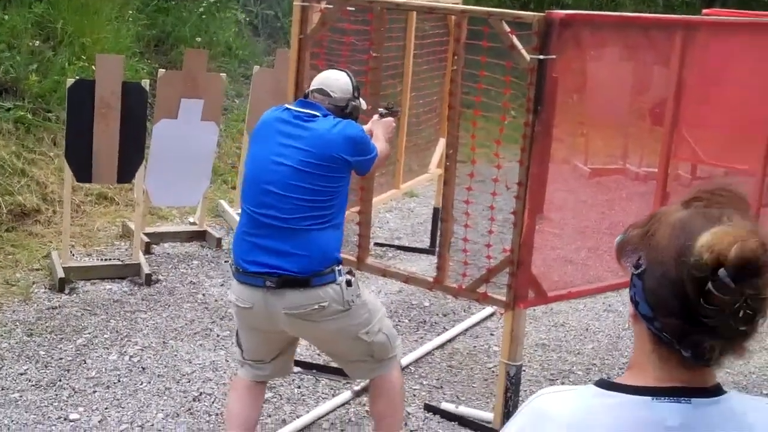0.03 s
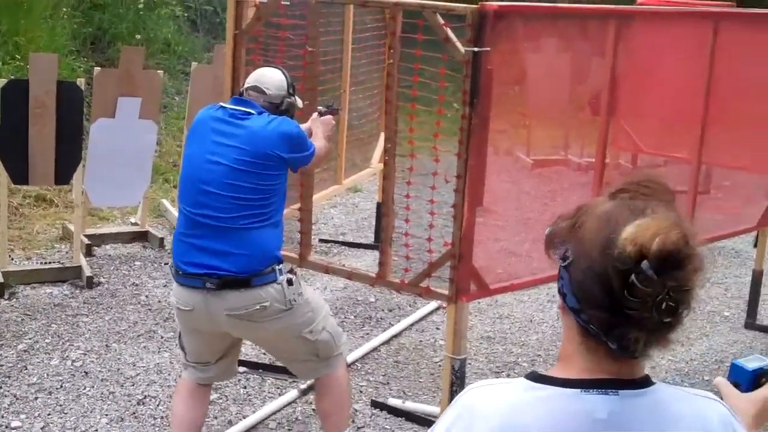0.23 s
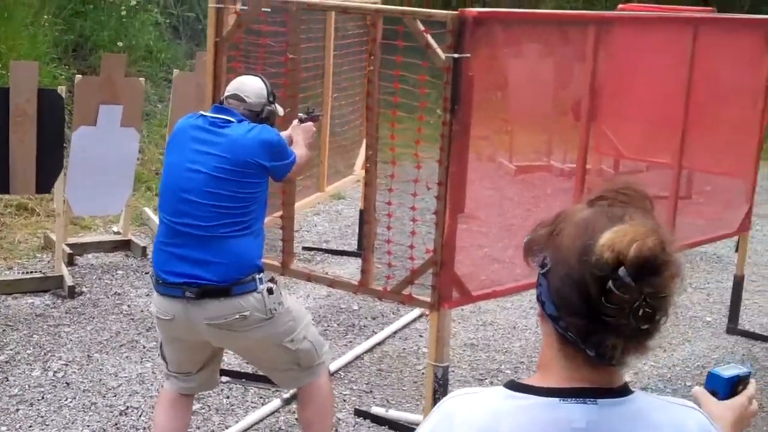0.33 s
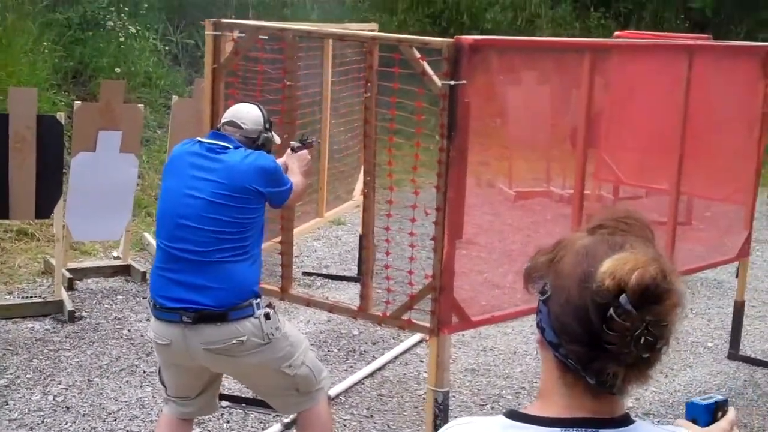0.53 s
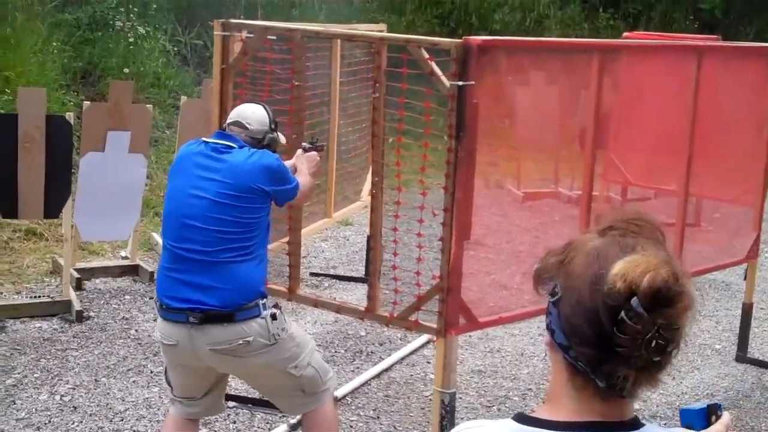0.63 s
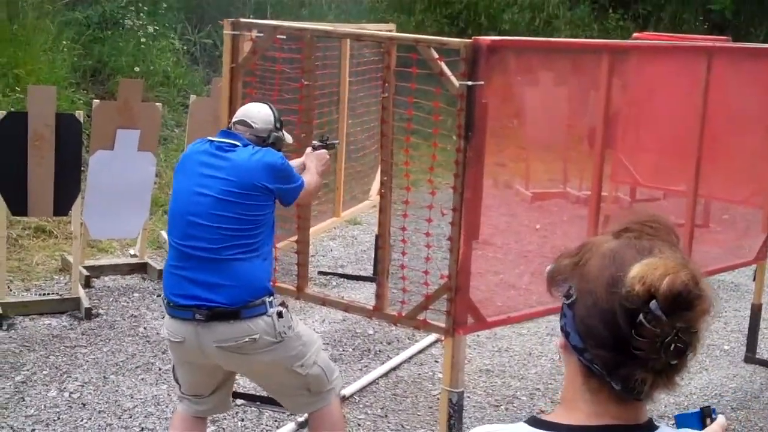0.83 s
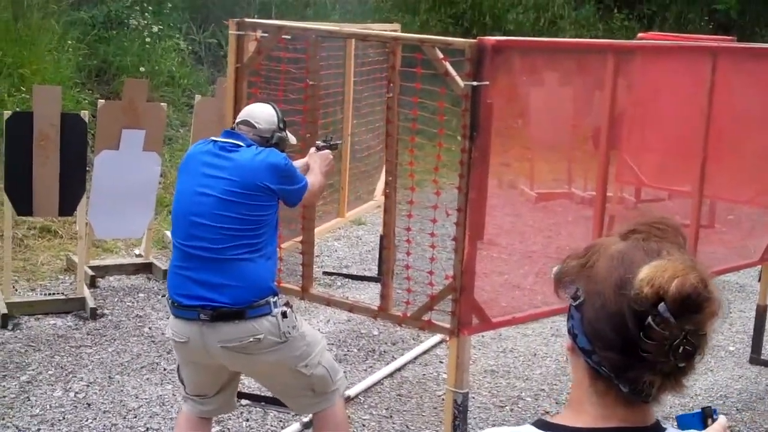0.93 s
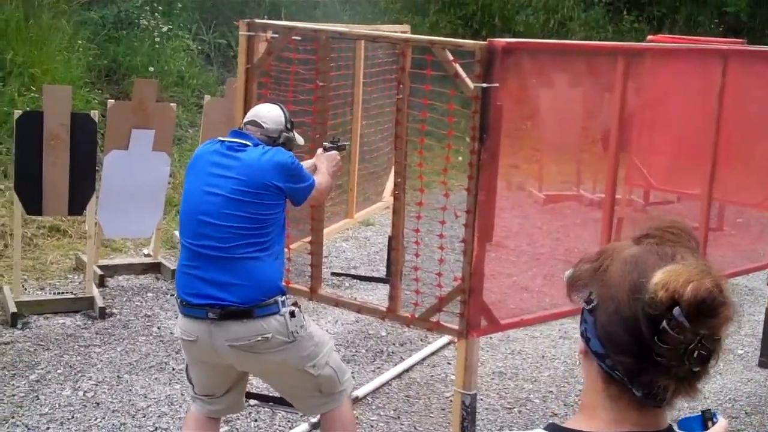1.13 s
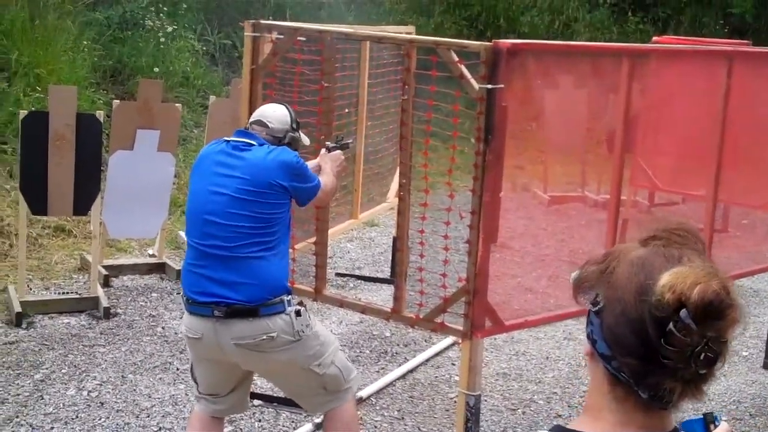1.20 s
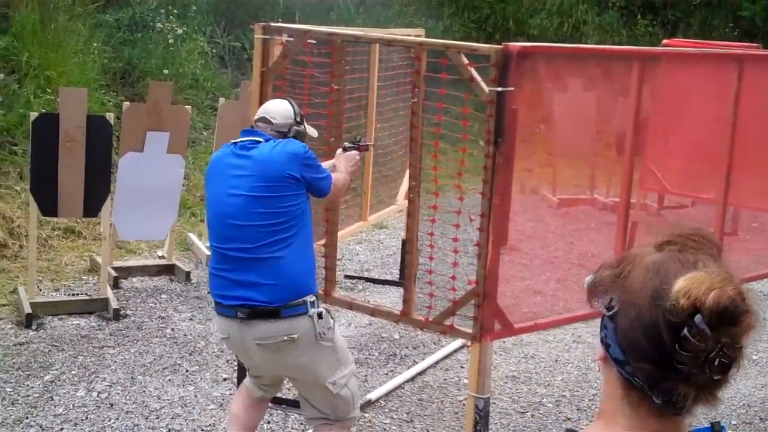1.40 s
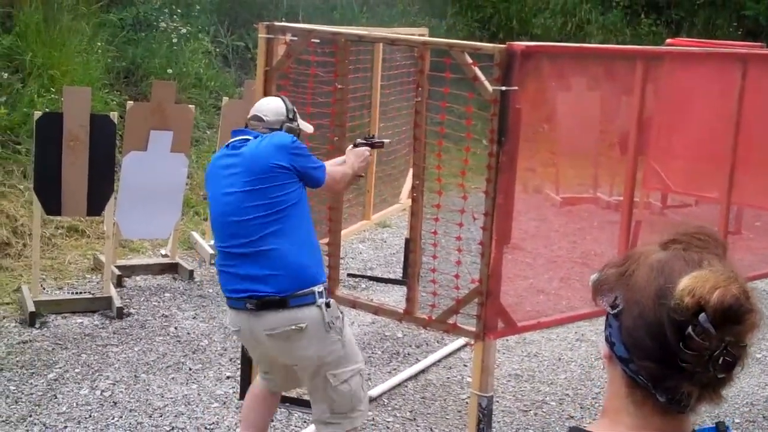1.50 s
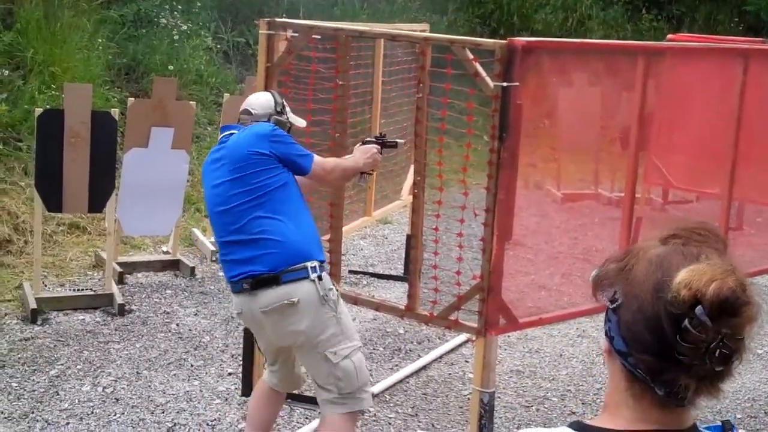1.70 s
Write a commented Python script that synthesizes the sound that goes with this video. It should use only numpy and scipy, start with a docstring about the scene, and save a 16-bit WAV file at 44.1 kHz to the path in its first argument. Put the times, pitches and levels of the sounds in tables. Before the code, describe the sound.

Four handgun shots fire about a third of a second apart at an outdoor range, each a harsh crack with quick slaps off nearby screens and a roll from trees; the close microphone overloads.

```python
"""Gunshots in a walled bay

A handgun fires four shots outdoors. Each blast is an N-shaped pressure wave with slaps from single walls; its
scatter off nearby screens, off earth banks and off far trees is coloured noise under falling levels.
Murmur and a wavering motor hum (two sines) lie behind; a short faint burst just ahead of the first shot and
faint ticks are decaying noise. The recorder overloads and turns its gain down."""
import sys
import numpy as np
from scipy import signal
from scipy.fft import rfft, irfft
from scipy.io import wavfile
from scipy.ndimage import uniform_filter1d, map_coordinates

SR = 44100
rng = np.random.default_rng(int(sys.argv[2]) if len(sys.argv) > 2 else 0)


def digitize_waveform(pressure):
    """Quantize a signal to 16-bit integers and store it at the path in sys.argv[1].

    Rows of a 2-D input are taken as channels; values are limited to [-1, 1].
    """
    field = np.atleast_2d(pressure).T
    bounded = np.clip(field, -1, 1)
    quanta = np.round(bounded * 32767).astype(np.int16)
    wavfile.write(sys.argv[1], SR, quanta)


def ratio_of_db(decibels):
    """Turn decibels (scalar or array-like) into linear amplitude factors; 0 dB maps to 1."""
    return 10 ** (np.asarray(decibels, float) / 20)


N = 77175
AGE = np.arange(N) / SR  # time from the start, s

# Every spectrum below is relative: the noise it shapes is then scaled to rms 1.
# All source levels are those ahead of the recorder's gain.

# Open-air murmur, spectrum: f/Hz, level/dB (per Hz)
AIR_SPECTRUM = [(30, -27), (200, -17.5), (300, -9.5), (600, 0.5), (1200, -4.5), (3700, -12), (5300, -21),
                (11000, -32), (13000, -45)]
# Open-air murmur, course: t/s, level/dB
AIR_LEVEL = [(0., -59), (.1, -59), (.2, -66.), (1.2, -56.5), (1.55, -62.5), (1.75, -60)]
# Partials of the motor hum: f/Hz, level/dB (relative)
HUM_PARTIALS = [(138., -3), (277., -5)]
# Course of the hum, added to its partials: t/s, level/dB
HUM_LEVEL = [(0., -77.5), (.2, -75.5), (.45, -61), (.6, -66), (.75, -85), (.88, -87), (.94, -52.5),
             (1.1, -61), (1.75, -74)]
# Short faint burst of noise just ahead of the first shot: t/s, starting level/dB, time to fall 60 dB/s
FORE_NOISE = (.2286, -46.5, 0.13)
# The same burst, spectrum: f/Hz, level/dB (per Hz)
FORE_NOISE_SPECTRUM = [(88, -43.5), (150, -37.5), (565, -15), (1700, -15), (4160, -14.5), (8950, -29),
                       (13000, -22)]
# Faint bright ticks: t/s, starting level/dB (before the high-pass)
TICKS = [(0.134, -69.5), (1.617, -42.5), (1.677, -49), (1.699, -47), (1.729, -47), (1.742, -48.5)]
# Roll from the far trees, spectrum: f/Hz, level/dB (per Hz)
FAR_SPECTRUM = [(59, -36), (150, -21), (300, -9), (600, -2), (1000, -1.), (1800, -6), (2500, -4),
                (4500, -11), (7300, -18), (10000, -22.5), (13800, -41.5)]
# Roll from the far trees, course: t/s (after the shot), level/dB
FAR_LEVEL = [(0., -22.5), (.15, -38), (.19, -36.5), (.24, -38), (.3, -40), (.34, -42.5), (.39, -49),
             (.47, -45), (.7, -59.5), (1.8, -70.5)]
# Scatter from the earth banks, spectrum: f/Hz, level/dB (per Hz)
BANK_SPECTRUM = [(35, -60), (100, -24.5), (300, -26), (700, -22.5), (1200, -14), (2000, -9), (3200, -6.5),
                 (5500, -13), (9400, -15.5), (13800, -31)]
# Scatter from nearby screens and ground, spectrum: f/Hz, level/dB (per Hz)
NEAR_SPECTRUM = [(30, -64), (70, -32), (200, -9.5), (450, -3.5), (800, -2), (1500, -4.5), (2500, -8),
                 (4000, -5), (6500, -14.5), (9500, -15), (13800, -45)]
# Near scatter comes in clumps, one per group of screens: t/s (after the shot)
SCREENS_S = [0, .012, .02, .023, .026, .029, .033, .036, .039, .0405, .043, .045, .06, .08, .15]
# Near scatter at those times: level/dB
SCREENS_DB = [-1.5, -3.5, -2.5, -17, -10, -0.5, -14.5, -8, -11.5, -16.5, -9, -16, -15.5, -23, -63.5]
# Snap, the brightest and closest scatter: f/Hz, level/dB (per Hz)
SNAP_SPECTRUM = [(300, -45), (1500, -3), (2200, 8), (4200, 8.5), (6500, 5), (10000, -8), (14500, -4.5)]
# Slaps from single walls: delay t/s, peak level/dB (before the band-pass), wave length/s
SLAPS = [(.014, 2.5, .0006), (.028, -7, .0005), (.037, -29, .0004), (.0418, -1, .0009)]
# One row per shot: strength/dB, left lead/dB
SHOTS = [(5, 0.5), (3.5, -0.5), (-0.5, -0.5), (-1, 1)]
# Moments of the shots: t/s
SHOT_S = [.2408, .6205, .9918, 1.2757]
# Left-right likeness of noise other than close scatter: f/Hz, likeness (held to 0..1 in use)
LIKENESS = [(60, 0.78), (180, 0.89), (520, 0.95), (1540, 0.68), (4540, -0.07), (13400, -0.058)]
# Left-right likeness of close scatter: f/Hz, likeness
NEAR_LIKENESS = [(60, 0.94), (180, 0.89), (520, 1), (1540, 0.82), (4540, 0.48), (13400, 0.16)]
# Stereo balance of all coloured noise: f/Hz, left over right level/dB
BALANCE_DB = [(60, 9.5), (180, 4), (520, 4.5), (1540, 4), (4540, 3.5), (13400, 1)]
# Recorder's own rumble, spectrum: f/Hz, level/dB (per Hz)
SELF_NOISE_SPECTRUM = [(15, -21.5), (60, 1), (200, -21.5), (1000, -8), (12000, -45.5)]

HUM_WOBBLE_DB, HUM_WOBBLE_RAD = 2.5, 0.5  # spreads of level and phase
TICK_T60_S, TICK_HZ = 0.039, 3520
PATCHY_DB, PATCH_PER_S, PATCH_SPLIT_HZ = 1.2, 45, 3980
FAR_TREBLE_DB, FAR_DULLING_DB_PER_S = 9.0, 12
BANK_DB, BANK_SAG_DB_PER_S, BANK_END_S, BANK_FALL_DB_PER_S = -12.5, 67.5, 0.12, 394
BANK_EDGE_DB = 1  # step down where the last bank ends
ECHOES_PER_S = 5900
SAMENESS = 0.59  # power share of near scatterers alike for every shot
ONSET_SHARE, ONSET_S, ONSET_RISE_S = 0.6, 0.0012, 0.0003  # scatter starts near this share, then rises to 1
SNAP_DB, SNAP_T60_S = -3.5, 0.059
RESNAP_S, RESNAP_DB, RESNAP_LENGTH_S = 0.0355, -4, 0.005  # level relative to the snap; decay constant
BLAST_DB, BLAST_S = -35.5, 0.00037  # peak before the band-pass; length of the N-wave
TOP, KNEE = 0.83, 6  # saturation ceiling and firmness
START_GAIN_DB, RECOVER_DB_PER_S, TURN_LAG_S = 29.5, 2.5, 0.018
TURN_DOWN_DB = 374  # dB per second per unit of mean square
BIAS = 0.5  # size of the lopsided offset
COUPLING_HZ, SOFTEN_HZ, CUT_HZ = 2.4, 10340, 15200
SELF_NOISE_DB = -74


def rms_one(x):
    """Normalisation: divide by the root mean square."""
    return x / np.sqrt(np.mean(x ** 2) + 1e-20)


def at_hz(points, hz):
    """Interpolation linear in the value over a logarithmic frequency axis."""
    table_hz, values = np.transpose(points)
    return np.interp(np.log(hz), np.log(table_hz), values)


def course(points):
    """Amplitude course: levels in dB interpolated linearly over time."""
    return ratio_of_db(np.interp(AGE, *np.transpose(points)))


def decay(db, t60_s):
    """Exponential decay: the level falls 60 dB in t60_s."""
    return ratio_of_db(db - 60 * AGE / t60_s)


def later(x, s):
    """Pure delay of s seconds."""
    lag = int(s * SR)
    return np.pad(x, ((0, 0), (lag, 0)))[:, :N]


def white():
    """White noise: independent Gaussian samples in two channels."""
    return rng.standard_normal((2, N))


def echoes():
    """Dense scattering: random impulses of uneven size have a flat mean spectrum; rms 1."""
    struck = rng.random((2, N)) < ECHOES_PER_S / SR
    return rms_one(struck * white())


def colour(pair, spectrum, likeness=LIKENESS):
    """Partial coherence: shared mid and opposed side noise set the left-right likeness; rms 1."""
    hz = np.maximum(np.arange(N // 2 + 1) * SR / N, 1)
    mid, side = rfft(pair) * ratio_of_db(at_hz(spectrum, hz))
    alike = np.clip(at_hz(likeness, hz), 0, 1)
    lean = at_hz(BALANCE_DB, hz) / 2
    both = np.sqrt(1 + alike) * mid + np.sqrt(1 - alike) * side * [[1], [-1]]
    return rms_one(irfft(both * ratio_of_db([lean, -lean]), N))


def drift(rate):
    """Band-limited wander: a cubic spline through random knots, rate per second; rms 1."""
    knots = rng.standard_normal(200)
    return rms_one(map_coordinates(knots, [np.minimum(AGE * rate, 198)], order=3))


def patchy(x, treble_db=0):
    """Amplitude modulation: bass and treble swell and sink unevenly, each on its own."""
    low_pass = signal.butter(1, PATCH_SPLIT_HZ, fs=SR, output="sos")
    bass = signal.sosfiltfilt(low_pass, x)
    treble = x - bass
    bass_gain = ratio_of_db(PATCHY_DB * drift(PATCH_PER_S))
    treble_gain = ratio_of_db(PATCHY_DB * drift(PATCH_PER_S) + treble_db)
    return bass * bass_gain + treble * treble_gain


def open_air():
    """Diffuse ambience: coloured noise whose level wanders."""
    return patchy(colour(white(), AIR_SPECTRUM)) * course(AIR_LEVEL)


def motor_hum():
    """Tonal radiation: sine partials wander in level and share one wandering phase."""
    phase = HUM_WOBBLE_RAD * drift(13.0)
    hum = 0
    for hz, db in HUM_PARTIALS:
        level = np.sqrt(2) * ratio_of_db(db + HUM_WOBBLE_DB * drift(15.0))
        hum = hum + level * np.sin(2 * np.pi * hz * AGE + phase)
    return hum * course(HUM_LEVEL)


def fore_noise():
    """Exponential decay of a noise burst: dense coloured impulses start at once and fade."""
    s, db, t60_s = FORE_NOISE
    return later(colour(echoes(), FORE_NOISE_SPECTRUM) * decay(db, t60_s), s)


def ticks():
    """Short transients: one high-passed hiss, decaying exponentially at each onset."""
    high_pass = signal.butter(2, TICK_HZ, "high", fs=SR, output="sos")
    hiss = signal.sosfilt(high_pass, white())
    return sum(later(hiss * decay(db, TICK_T60_S), s) for s, db in TICKS)


def far_roll(noise):
    """Late scattering with air absorption: the trees' roll loses treble as it ages."""
    treble_db = FAR_TREBLE_DB - FAR_DULLING_DB_PER_S * AGE
    return patchy(colour(noise, FAR_SPECTRUM), treble_db) * course(FAR_LEVEL)


def bank_scatter(noise):
    """Two-slope decay: scatter sags steadily, then falls fast after the last bank."""
    past_end = np.maximum(AGE - BANK_END_S, 0)
    level_db = BANK_DB - BANK_SAG_DB_PER_S * AGE - BANK_FALL_DB_PER_S * past_end
    level_db = level_db - BANK_EDGE_DB * (AGE > BANK_END_S)
    return patchy(colour(noise, BANK_SPECTRUM)) * ratio_of_db(level_db)


def near_scatter(fixed):
    """Early reflections: partly repeated echoes, clumped in time by the groups of screens."""
    pattern = np.sqrt(SAMENESS) * fixed + np.sqrt(1 - SAMENESS) * echoes()
    return colour(pattern, NEAR_SPECTRUM, NEAR_LIKENESS) * ratio_of_db(np.interp(AGE, SCREENS_S, SCREENS_DB))


def snap():
    """Closest scattering: bright echoes decay fast; a facing wall lifts them once more."""
    again = ratio_of_db(SNAP_DB + RESNAP_DB) * (AGE > RESNAP_S) * np.exp(-np.abs(AGE - RESNAP_S) / RESNAP_LENGTH_S)
    return colour(echoes(), SNAP_SPECTRUM, NEAR_LIKENESS) * (decay(SNAP_DB, SNAP_T60_S) + again)


def n_wave(length_s):
    """Shock wave: pressure jumps up, ramps through zero and jumps back."""
    return np.linspace(1, -1, max(int(length_s * SR), 3))


def blast_and_slaps():
    """Direct sound and specular reflection: inverted N-waves, band-limited together."""
    direct = np.zeros(N)
    for delay_s, db, length_s in [(0.0, BLAST_DB, BLAST_S)] + SLAPS:
        wave, start = n_wave(length_s), int(delay_s * SR)
        direct[start:start + len(wave)] -= ratio_of_db(db) * wave
    band = signal.butter(2, [300.0, 7000.0], "band", fs=SR, output="sos")
    return signal.sosfilt(band, direct)


def gunfire():
    """Superposition: each shot sums its blast, slaps and scatter, with its own strength and side."""
    out, fixed, direct = 0, echoes(), blast_and_slaps()
    rise = ONSET_SHARE + (1 - ONSET_SHARE) / (1 + np.exp((ONSET_S - AGE) / ONSET_RISE_S))
    for s, (db, lead_db) in zip(SHOT_S, SHOTS):
        near = near_scatter(fixed)
        bank_noise, far_noise = white(), white()
        scatter = near + snap() + bank_scatter(bank_noise) + far_roll(far_noise)
        sides = ratio_of_db([[db + lead_db / 2], [db - lead_db / 2]])
        out = out + later((scatter * rise + direct) * sides, s)
    return out


def scene():
    """Linear superposition of all sources."""
    return gunfire() + fore_noise() + ticks() + open_air() + motor_hum()


def overload(x):
    """Saturation: output approaches a ceiling through a firm knee."""
    return x / (1 + np.abs(x / TOP) ** KNEE) ** (1 / KNEE)


def gain_control(x, size=64):
    """Feedback control: gain sinks with the lagged output power and creeps back slowly."""
    gains, gain_db, felt, step_s = [], START_GAIN_DB, 0, size / SR
    for i in range(0, N, size):
        power = np.mean(overload(x[:, i:i + size] * ratio_of_db(gain_db)) ** 2)
        felt += (power - felt) * step_s / max(TURN_LAG_S, step_s)
        change_db = (RECOVER_DB_PER_S - TURN_DOWN_DB * felt) * step_s
        gain_db = min(gain_db + change_db, START_GAIN_DB)
        gains.append(gain_db)
    return ratio_of_db(np.interp(np.arange(N), np.arange(0, N, size), gains))


def roll_off(x):
    """The treble ends steeply here."""
    return signal.sosfilt(signal.butter(12, 14000, fs=SR, output="sos"), x)


def record(dry):
    """Nonlinear recording chain: gain control, overload, offset, filters, own rumble and clipping."""
    hot = overload(dry * gain_control(dry))
    # lopsided overload: an offset follows the power over 300 samples
    hot = hot + BIAS * uniform_filter1d(hot ** 2, size=300) ** 1.5
    # coupling capacitor
    hot = signal.sosfilt(signal.butter(1, COUPLING_HZ, "high", fs=SR, output="sos"), hot)
    # gentle treble loss
    hot = signal.sosfilt(signal.butter(2, SOFTEN_HZ, fs=SR, output="sos"), hot)
    hot = hot + ratio_of_db(SELF_NOISE_DB) * colour(white(), SELF_NOISE_SPECTRUM)
    # steep treble cut
    hot = signal.sosfilt(signal.cheby2(12, 60, CUT_HZ, fs=SR, output="sos"), hot)
    mix = np.clip(hot, -1, 1)
    return roll_off(mix)


dry = scene()
out = record(dry)
digitize_waveform(out)
```